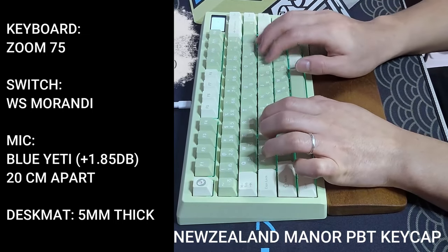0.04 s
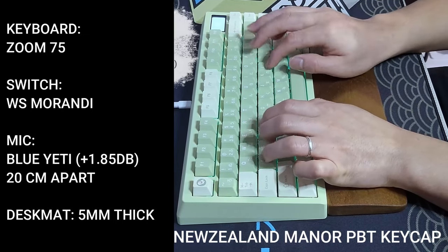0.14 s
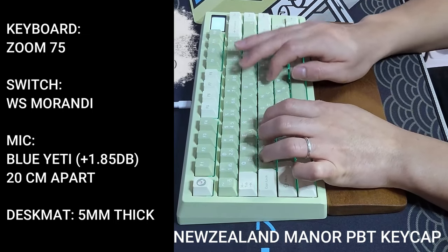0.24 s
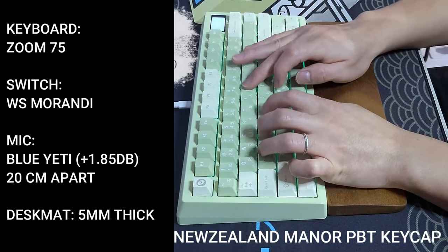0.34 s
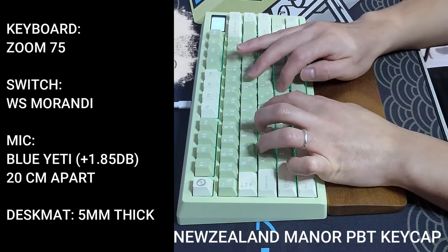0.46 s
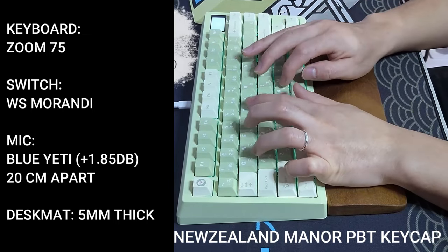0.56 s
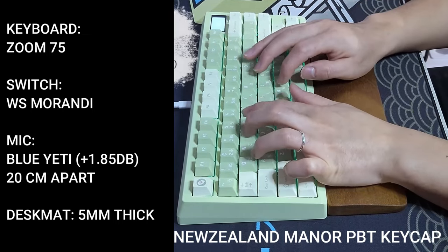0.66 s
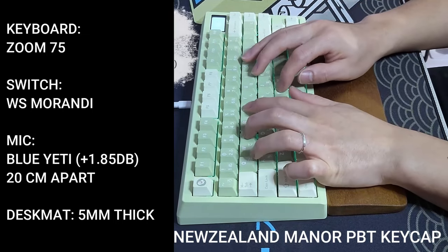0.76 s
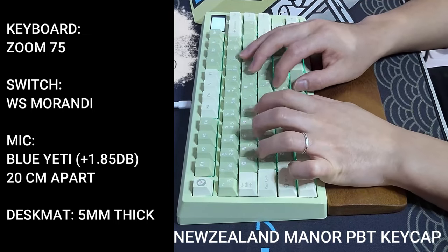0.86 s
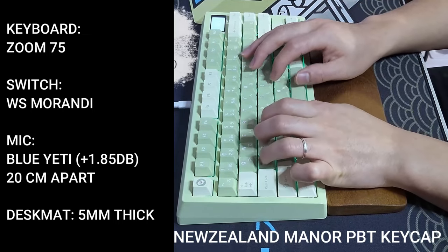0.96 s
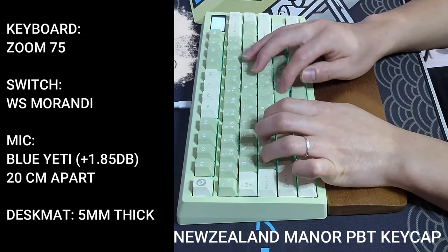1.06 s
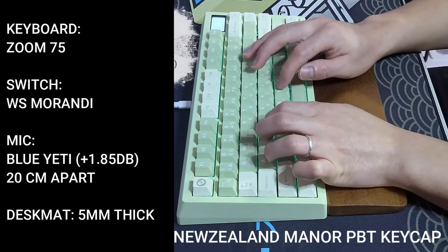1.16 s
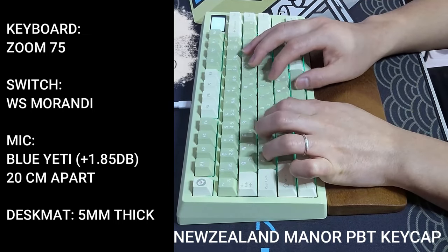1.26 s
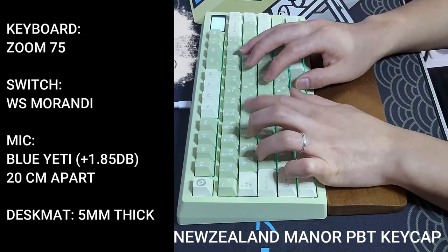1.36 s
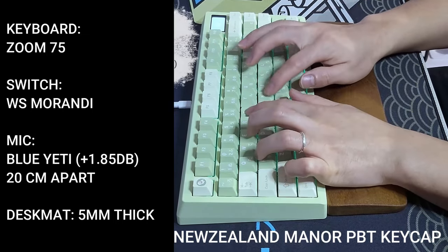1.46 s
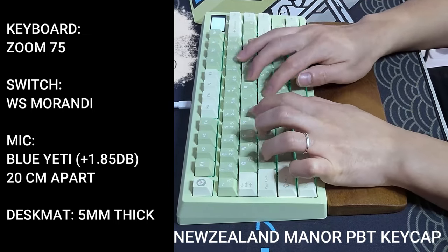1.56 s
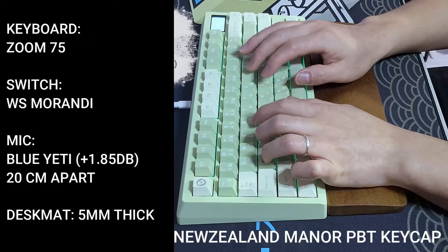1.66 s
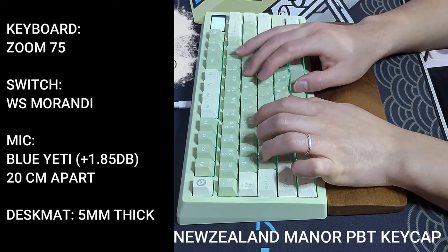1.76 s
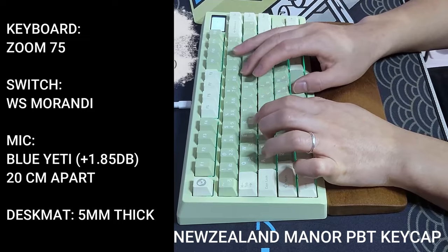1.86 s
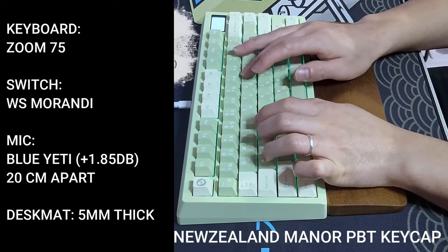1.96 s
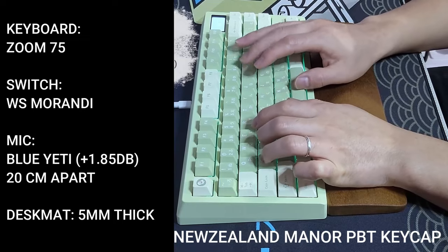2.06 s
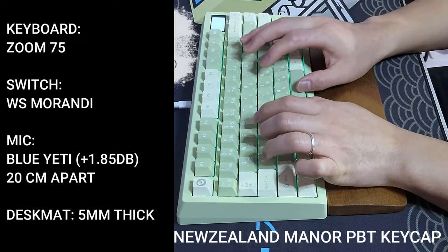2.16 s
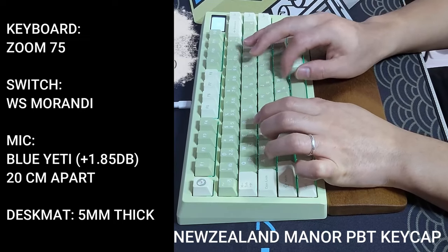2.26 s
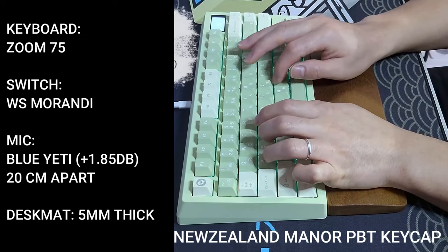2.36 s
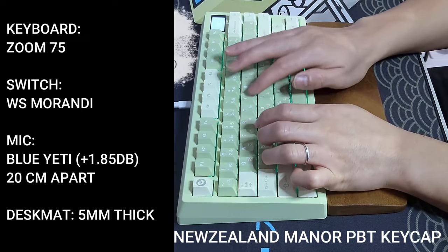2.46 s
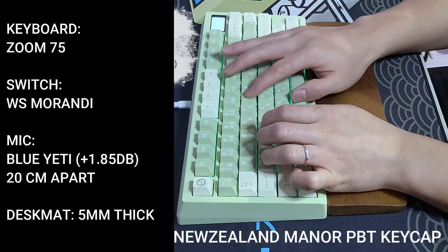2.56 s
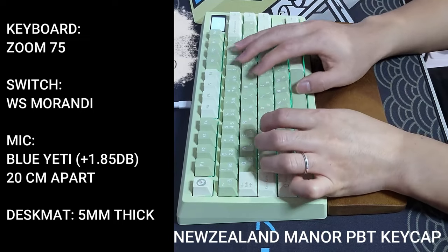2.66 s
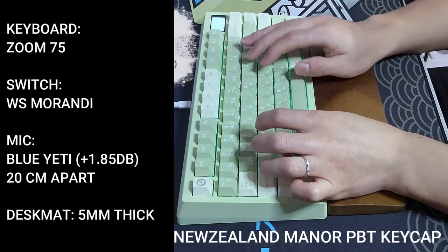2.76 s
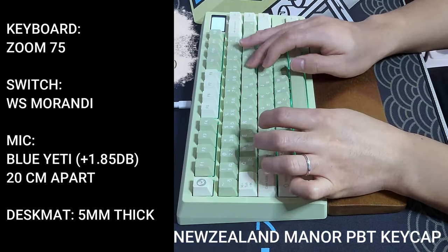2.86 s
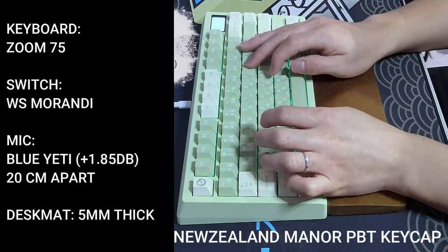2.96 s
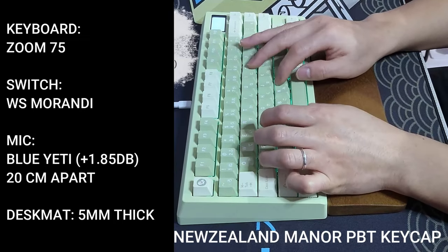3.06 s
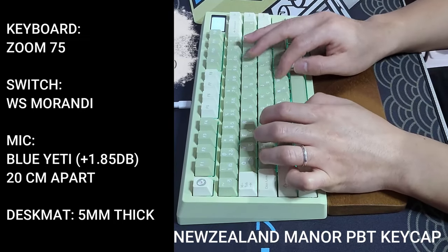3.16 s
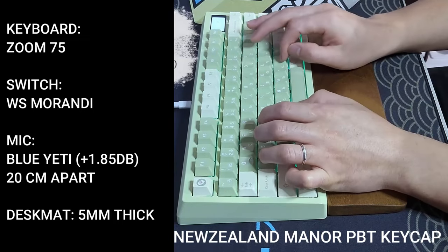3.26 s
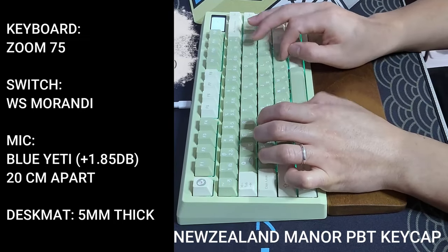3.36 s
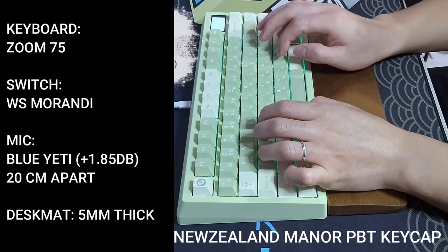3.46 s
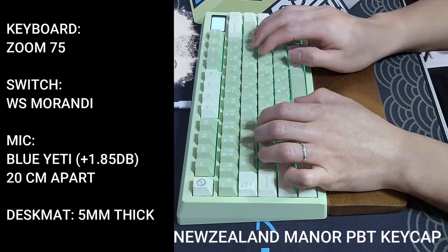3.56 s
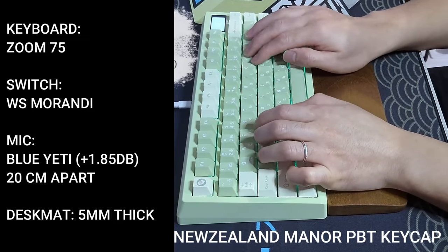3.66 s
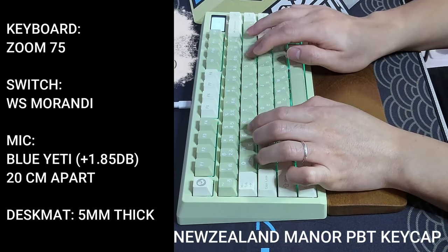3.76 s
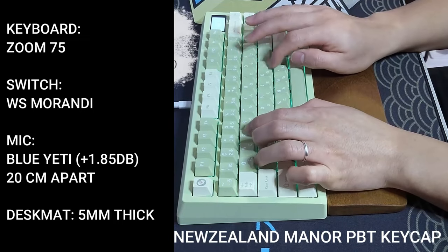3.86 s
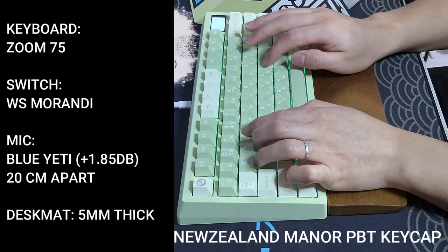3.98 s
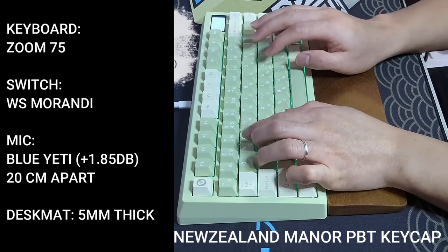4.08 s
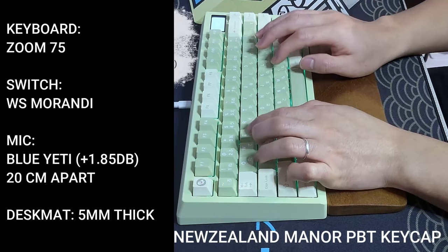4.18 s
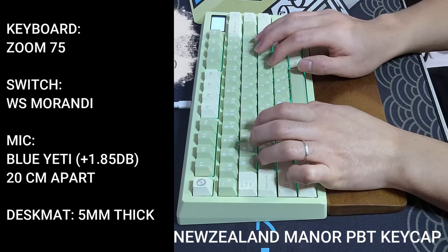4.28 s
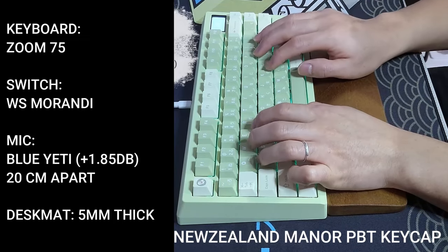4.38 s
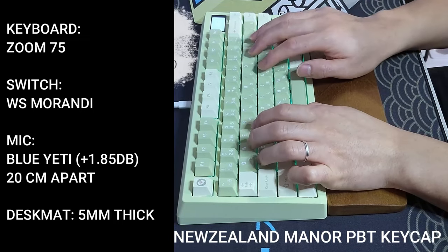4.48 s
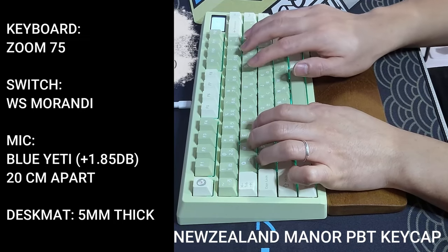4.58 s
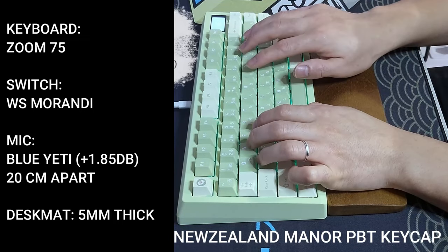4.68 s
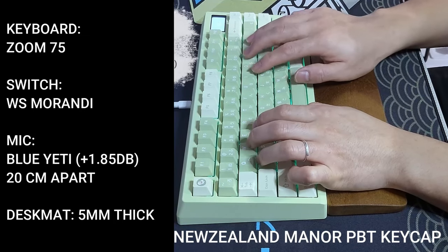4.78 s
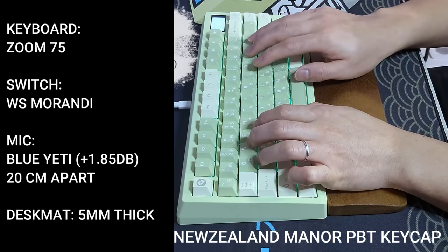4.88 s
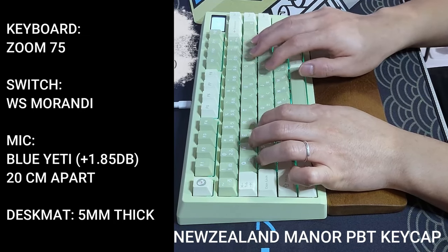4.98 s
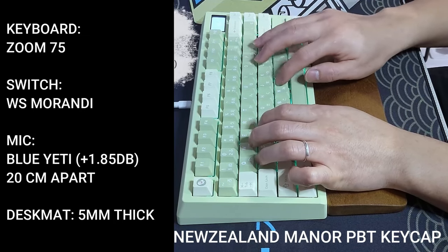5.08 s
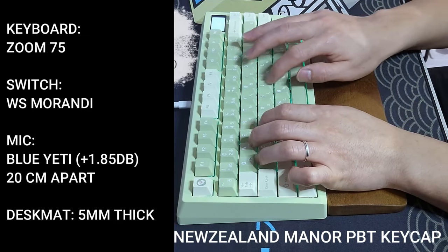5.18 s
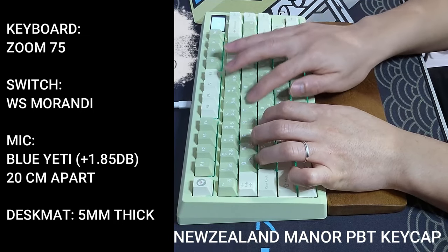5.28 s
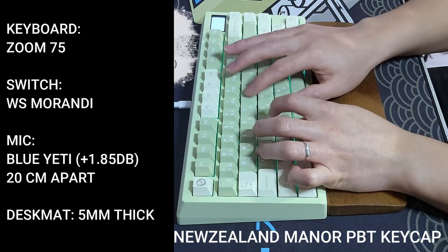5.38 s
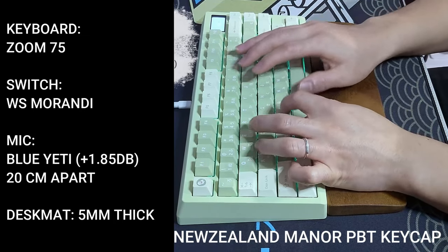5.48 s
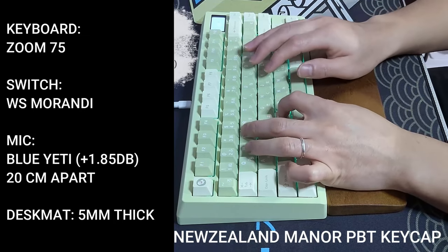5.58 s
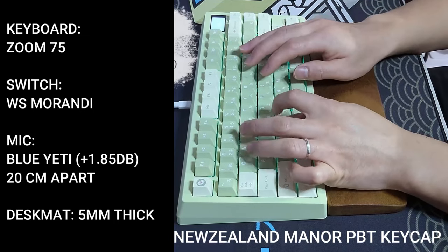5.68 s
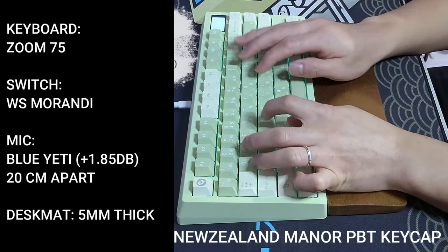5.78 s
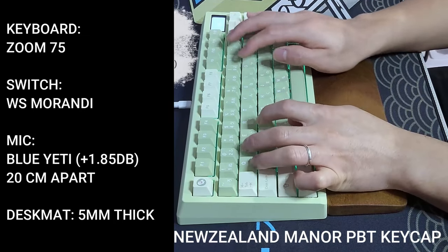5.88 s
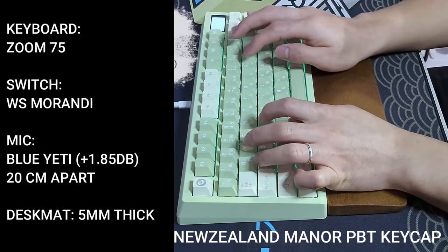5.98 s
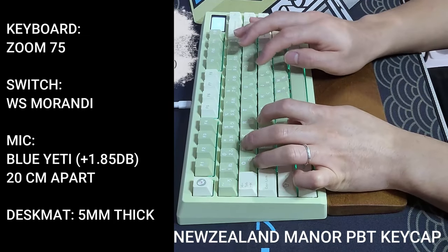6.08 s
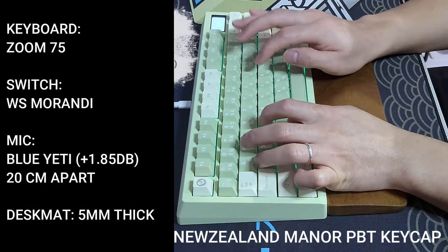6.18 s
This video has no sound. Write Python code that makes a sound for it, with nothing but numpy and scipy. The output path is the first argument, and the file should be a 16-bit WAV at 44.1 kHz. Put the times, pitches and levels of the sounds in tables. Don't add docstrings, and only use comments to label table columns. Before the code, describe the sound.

Dry, poppy key clicks in irregular quick bursts, close to the microphone. Each press is a very short knock of plastic cap and plate, with little sharp treble, followed by a softer release. Fingertips rustle faintly. A dense run lasts about four seconds, a pause of over half a second follows, then a final flurry. Slight short room echo and low hum behind.

```python
import sys
import numpy as np
from scipy import signal
from scipy.fft import rfft, irfft
from scipy.io import wavfile
from scipy.ndimage import uniform_filter1d

SR = 44100
rng = np.random.default_rng(int(sys.argv[2]) if len(sys.argv) > 2 else 0)


def ratio_of_db(decibels):
    return 10 ** (np.asarray(decibels, float) / 20)


def put_to_file(sound):
    columns = np.atleast_2d(sound).T
    safe = np.clip(columns, -1, 1)
    whole_steps = np.round(safe * 32767)
    wavfile.write(sys.argv[1], SR, whole_steps.astype(np.int16))


N = 274743

# (time [s], level [dB])
HAND_ACTIVITY = [(0.0, 4.5), (0.75, 2.5), (1.0, 0.5), (2.06, -2), (2.36, 3), (2.62, 4.5), (2.86, -0.5),
                 (3.45, 2.5), (4.16, -1.5), (4.4, -5), (4.96, -11.5), (5.17, -2.5), (5.55, 3.5),
                 (6.06, 2.5), (6.23, -2)]
# (lower limit [Hz], below it the part is too small to radiate;
# upper limit [Hz], above it the contact is too slow; settling rattle [dB])
CONTACT_SOFTNESS = [
    (1516, 3150, -23.5),
    (594, 9900, -20),
    (313, 1050, -22.5),
    (2470, 8970, -21.5),
    (6000, 12400, -21),
]


def rms_one(x):
    return x / np.sqrt(np.mean(x ** 2) + 1e-20)


def in_time(rows):
    return np.interp(np.arange(N) / SR, *np.transpose(rows))


def at_hz(rows, hz, axis=1):
    rows = np.array(rows)
    return np.interp(np.log(hz + 1e-9), np.log(rows[:, 0]), rows[:, axis])


def bandpass(x, order, low_hz, high_hz):
    edges_hz = [low_hz, min(high_hz, 0.45 * SR)]
    return signal.sosfilt(signal.butter(order, edges_hz, "band", fs=SR, output="sos"), x)


def coloured(spectrum):
    hz = np.fft.rfftfreq(N, 1 / SR)
    gain = ratio_of_db(at_hz(spectrum, hz)) * (hz > 6)
    return rms_one(irfft(rfft(rng.standard_normal(N)) * gain, N))


def ring(x, hz, t60):
    radius = ratio_of_db(-60 / (t60 * SR))
    angle = 2 * np.pi * hz / SR
    poles = [1, -2 * radius * np.cos(angle), radius * radius]
    return signal.lfilter([0, np.sin(angle)], poles, x + 1e-18)


def struck(at_s, modes, level_db, contact):
    scatter_db, settle_t60_s = 1.5, 0.023
    low_hz, high_hz, settle_db = contact
    at = np.round(at_s * SR).astype(int)
    scatter = rng.standard_normal((len(at), len(modes)))
    small = 1 + low_hz / 3500
    fade = ratio_of_db(-60 * small / (settle_t60_s * SR))
    out = np.zeros(N)
    for k, (hz, mode_db, t60) in enumerate(modes):
        blows = np.zeros(N)
        np.add.at(blows, at, ratio_of_db(level_db + mode_db + scatter_db * small * scatter[:, k]))
        settling = signal.lfilter([0, 1], [1, -fade], blows)
        rattle = settling * rng.standard_normal(N) * ratio_of_db(settle_db)
        out += ring(blows + rattle, hz, t60)
    return bandpass(out, 2, low_hz, high_hz)


def contacts():
    # (time [s], keycap [dB], plate [dB], tick [dB], case [dB])
    clacks = [(.4533, -21.5, -27, -39.5, -34), (.5661, -19.5, -23, -33, -34),
              (.8213, -22, -29.5, -45.5, -38), (1.3087, -20.5, -44, -41, -33.5),
              (1.5307, -24.5, -26, -55, -36), (2.0384, -27.5, -30.5, -44, -40),
              (2.6386, -18.5, -23, -38.5, -35), (2.950, -16.5, -24, -33.5, -31.5),
              (3.0144, -23, -28, -37.5, -32), (3.0864, -16.5, -18.5, -34, -29.5),
              (3.4224, -17, -24, -31.5, -32), (3.8291, -28, -33, -41, -50), (3.9283, -23, -28, -39, -33),
              (4.1039, -25.5, -29.5, -38, -34.5), (5.4333, -18.5, -24.5, -37.5, -34.5),
              (5.5073, -17, -28, -52, -38), (5.7689, -21, -35, -39, -29.5), (5.9541, -23, -30.5, -41, -41)]
    # (time [s], keycap [dB], plate [dB], tick [dB], case [dB])
    thocks = [(0.1144, -34, -27, -43.5, -33.5), (.169, -24, -21, -42, -34.5),
              (0.2068, -20, -22.5, -35.5, -32), (.2744, -26.5, -20, -43, -41),
              (0.5164, -22, -16.5, -45, -31.5), (0.7474, -22, -23.5, -67, -34.5),
              (0.878, -23, -23, -47, -36.5), (1.0896, -20, -19.5, -33, -34), (1.208, -21, -18, -38, -40),
              (1.5187, -32, -22.5, -52, -35), (1.6218, -24.5, -26.5, -40, -39.5),
              (1.6757, -22, -22, -38, -34.5), (2.049, -29, -23, -42, -32.5), (2.4242, -23, -21.5, -39, -33),
              (2.7188, -24.5, -26, -49.5, -37), (3.1855, -21, -21, -34, -35),
              (3.5251, -36.5, -31, -40.5, -32.5), (3.629, -24.5, -23, -54, -38.5),
              (4.3254, -26.5, -21.5, -48.5, -51), (5.1975, -23, -23.5, -37, -39.5),
              (5.5214, -51, -32.5, -42, -28.5), (5.6018, -25.5, -15, -53, -33.5)]
    # (time [s], keycap [dB], plate [dB], tick [dB], case [dB])
    taps = [(0.027, -24, -24, -45, -36.5), (0.5562, -27, -40, -45, -39.5), (0.65, -26.5, -27, -37.5, -32),
            (1.4096, -37, -28.5, -47, -42), (1.7152, -26, -34, -46.5, -39),
            (1.7725, -27.5, -52, -50, -36.5), (1.7895, -27, -25.5, -46, -41.5), (1.912, -34, -47, -43, -32),
            (2.154, -28.5, -33, -54, -41), (2.1803, -25, -32.5, -43.5, -36.5),
            (2.5006, -31.5, -33, -50.5, -35), (3.2407, -27.5, -32, -54, -35.5),
            (3.3021, -36, -29.5, -74, -41.5), (3.795, -26.5, -33, -42, -40),
            (4.0352, -30.5, -33, -44, -41.5), (4.2907, -29, -40, -56, -36.5), (5.273, -31.5, -27, -49, -38),
            (5.6371, -25.5, -28.5, -40, -37), (6.0288, -30, -41, -45, -35.5),
            (6.036, -33.5, -20, -47, -43.5)]
    # (time [s], keycap [dB], plate [dB], tick [dB])
    returns = [(.0004, -39, -36, -55), (.019, -39, -35, -50), (.121, -31.5, -27, -54),
               (.3099, -29, -39, -43), (.3134, -34, -39, -45), (.6147, -37, -50, -69),
               (.9466, -34.5, -35, -61), (.9776, -34, -37, -53), (1.1961, -31, -28, -53),
               (1.285, -32, -29, -51), (1.4069, -30.5, -43, -48.5), (1.6438, -34, -39, -64),
               (2.2639, -31, -30, -64), (2.3065, -38.5, -29.5, -52), (2.3667, -32, -28, -46),
               (2.8171, -39, -41, -54), (2.8274, -36.5, -29.5, -53), (2.8463, -30.5, -42, -64),
               (3.4955, -34, -37.5, -56), (3.8314, -29, -30, -66), (3.9956, -36.5, -52.5, -42),
               (4.0823, -36.5, -30, -58), (4.189, -33.5, -31.5, -85), (5.2936, -32, -28.5, -59),
               (5.3018, -42, -63, -50), (5.310, -39, -41, -50), (5.7267, -37.5, -47, -74),
               (5.7636, -34, -23.5, -40), (6.094, -34, -32, -54), (6.2076, -50.5, -84, -77)]
    # (time [s], keycap [dB], plate [dB], tick [dB])
    touches = [(.012, -40, -27, -51), (0.1965, -38, -50, -49), (.256, -54, -52, -66),
               (0.441, -43, -62, -46), (0.447, -60, -53, -52), (0.504, -42, -39, -53),
               (1.3882, -44, -44, -52), (1.6064, -43, -47, -55), (1.6616, -46, -44, -49),
               (1.899, -37.5, -35, -64), (2.411, -52, -31.5, -48), (2.620, -53, -57, -61),
               (2.697, -54, -53, -66), (2.9135, -54, -56, -78), (2.9377, -54, -40, -50),
               (2.9422, -38.5, -32.5, -67), (3.072, -61, -44, -52), (3.171, -55, -38, -51),
               (3.4071, -48, -62, -64), (3.411, -48, -42, -50), (3.609, -44, -61.5, -60),
               (3.7717, -49, -41, -57), (3.7791, -44, -56, -67), (5.0906, -48.5, -49, -59),
               (5.1756, -56, -40, -54), (5.252, -58, -66, -60), (5.418, -46, -70, -61),
               (5.709, -45, -45, -61), (5.9342, -44, -56, -60), (6.0134, -40, -36, -49)]
    # (time [s], keycap [dB], plate [dB], tick [dB])
    bounces = [(0.1425, -49, -60, -64), (.2127, -40, -62, -60), (0.2802, -36.5, -52, -57),
               (1.2877, -52, -31, -62), (1.776, -60, -34, -80), (1.930, -46, -72, -77),
               (1.954, -59, -55, -75), (2.7231, -35, -32, -51), (3.4994, -40, -50, -66),
               (3.638, -52, -36, -64), (4.2968, -39, -52, -48), (6.0421, -53.5, -49.5, -69),
               (6.1005, -42, -30.5, -52), (6.1056, -54, -38, -67)]
    light_case_db = [
        -37.5,
        -40,
        -40,
    ]
    usual_db, usual_tick_db, usual_stem_db = -25, -45, -42.5
    case_follows, stem_follows, stem_hardens = 0.76, 0.4, 0.6

    landings = np.vstack([clacks, thocks, taps])
    light = [returns, touches, bounces]
    at_s, cap_db, plate_db, tick_db = np.vstack([landings[:, :4], *light]).T
    blow_db = 20 * np.log10(ratio_of_db(cap_db) + ratio_of_db(plate_db)) - usual_db
    light_db = np.repeat(light_case_db, [len(table) for table in light])
    light_db = light_db + case_follows * blow_db[len(landings):]
    case_db = np.r_[landings[:, 4], light_db]
    stem_db = usual_stem_db + stem_follows * blow_db + stem_hardens * (tick_db - usual_tick_db)
    return at_s, cap_db, plate_db, case_db, stem_db, tick_db


def nearest(at_s, about_s):
    return at_s[np.abs(at_s[:, None] - about_s).argmin(axis=0)]


def wide_keys(at_s):
    # (time [s], desk thud [dB], stabiliser wire [dB])
    wide = [(0.0004, -45, -52), (0.018, -45.5, -52), (0.1153, -41.5, -53), (0.169, -48.5, -72),
            (0.5163, -44, -73), (0.5661, -41.5, -80), (0.9778, -41, -56), (1.0897, -41, -56),
            (1.207, -43.5, -77), (1.308, -44.5, -52), (1.4105, -46.5, -59), (1.5192, -38, -52),
            (1.9118, -39.5, -95), (2.05, -41, -54), (2.1822, -44, -76), (2.3065, -47.5, -55),
            (2.3667, -38, -49), (2.6386, -41, -74.5), (2.7193, -43, -60), (2.8274, -42.5, -58),
            (3.4234, -40.5, -68), (3.5251, -35.5, -47), (3.638, -45, -64), (5.5075, -65, -58),
            (5.5218, -36, -38), (5.6022, -38.5, -57)]
    # (frequency [Hz], level [dB], t60 [s])
    thud_modes = [(224.3, 2.5, 0.042), (241, -30.5, 0.033)]
    # (frequency [Hz], level [dB], t60 [s])
    wire_modes = [(4680, 2, .014), (4970, -8, .008)]
    wide_s, thud_db, wire_db = np.transpose(wide)
    wide_s = nearest(at_s, wide_s)
    thud = struck(wide_s, thud_modes, thud_db, (130, 600, -40))
    wire = struck(wide_s + 0.00102, wire_modes, wire_db, (4000, 6000, -18))
    return wire - thud


def hollow_caps(at_s):
    # (time [s], level [dB])
    hollow = [(0.169, -21.5), (0.2749, -26), (0.3099, -48), (0.5165, -27), (0.6147, -33.5), (0.8779, -27.5),
              (0.9776, -28.5), (1.0897, -18.5), (1.1961, -39), (1.208, -28), (1.285, -51), (1.4064, -36),
              (1.9118, -26), (2.5006, -34), (2.847, -28), (3.1851, -35), (3.4229, -41), (3.5245, -24.5),
              (3.6292, -19), (4.1039, -53.5), (4.3242, -26), (5.2733, -35), (5.2936, -40), (5.5218, -23.5)]
    # (frequency [Hz], level [dB], t60 [s])
    cavity_modes = [(1400, -3, .010), (1600, -9, .008)]
    # (frequency [Hz], level [dB], t60 [s])
    rim_modes = [(5600, -30, 0.0017), (6930, -35.5, .014)]
    hollow_s, hollow_db = np.transpose(hollow)
    hollow_s = nearest(at_s, hollow_s)
    cavity = struck(hollow_s, cavity_modes, hollow_db, CONTACT_SOFTNESS[1])
    rim = struck(hollow_s, rim_modes, hollow_db, CONTACT_SOFTNESS[3])
    return cavity - rim


def keys():
    # (frequency [Hz], level [dB], t60 [s])
    keycap_modes = [(2115, -1.5, 0.0098), (2385, -5, 0.0078), (2742, -10.5, 0.0066), (1800, -52, 0.0017)]
    plate_modes = [(1160, -8, .011), (1290, -13, .009)]
    case_modes = [(453, -15.5, 0.0047), (558, 0, 0.016), (670, 0.5, 0.016)]
    stem_modes = [(3410, -40, 0.0024), (4440, -6, 0.0028), (5150, -8, 0.0013), (6320, -14, 0.0036),
                  (6900, -23.5, 0.0085)]
    spring_modes = [(8040, -11.5, 0.0017), (9630, -7, 0.00092), (12500, 2, 0.0018), (13240, -22, 0.0062),
                    (14950, -7.5, 0.0035)]
    at_s, *levels = contacts()
    part_modes = [keycap_modes, plate_modes, case_modes, stem_modes, spring_modes]
    parts = zip(part_modes, levels, CONTACT_SOFTNESS)
    cap, plate, case, stem, spring = [struck(at_s, *part) for part in parts]
    return cap + stem + spring - plate - case + wide_keys(at_s) - hollow_caps(at_s)


def room(x):
    # (frequency [Hz], level [dB], t60 [s])
    tail = [(149, -27.5, 1), (391.4, -24.5, 0.33), (1000, -31, 0.34), (2200, -35, 0.5), (4490, -31.5, 0.2),
            (9000, -37.5, .15), (15940, -42, .12)]
    # (delay [s], level [dB])
    echoes = [
        (.0098, -23.5),
        (0.0216, -33),
    ]
    t = np.arange(SR // 2) / SR
    edges_hz = 100 * 2 ** np.arange(0, 7.6, 0.5)
    white = rng.standard_normal((2, 3, len(t)))
    answers = 0
    for k, (low, high) in enumerate(zip(edges_hz, edges_hz[1:])):
        sos = signal.butter(2, [low, high], "band", fs=SR, output="sos")
        band = signal.sosfilt(sos, white[k % 2])
        hz = np.sqrt(low * high)
        decay_db = -60 * t / at_hz(tail, hz, axis=2)
        answers = answers + band * ratio_of_db(at_hz(tail, hz) - 17 + decay_db)
    answers *= np.clip(t / 0.0063, 0, 1)
    turn = 2 * np.pi * (np.arange(N) * 3.1 / SR + np.arange(3)[:, None] / 3)
    out = signal.fftconvolve(x * np.cos(turn), answers, axes=1)[:, :N].sum(axis=0)
    dull = signal.sosfilt(signal.butter(1, 5000, fs=SR, output="sos"), x)
    for delay_s, echo_db in echoes:
        delay = round(delay_s * SR)
        out[delay:] += ratio_of_db(echo_db) * dull[:-delay]
    return out


def fingers():
    # (frequency [Hz], density [dB per Hz])
    skin = [(700, -6), (2100, 9), (3500, 0.5), (6500, -4), (9500, -8.5), (12500, -4.5), (16000, -5.5)]
    # (start [s], length [s], centre [Hz], level [dB])
    slides = [
        (0.664, 0.076, 6500, -81),
        (2.436, 0.034, 1800, -61.5),
        (2.435, .05, 6000, -89),
        (2.54, .07, 6500, -79),
        (2.712, 0.16, 11400, -73.5),
        (3.672, .03, 7000, -78),
        (4.127, 0.13, 6300, -81.5),
        (5.52, 0.11, 6000, -77),
        (5.616, 0.013, 11000, -67),
    ]
    rustle_db = -78
    grain = ratio_of_db(1.4 * rms_one(uniform_filter1d(rng.standard_normal(N), size=150)))
    out = ratio_of_db(rustle_db + in_time(HAND_ACTIVITY)) * rms_one(coloured(skin) * grain)
    for start_s, length_s, hz, slide_db in slides:
        i, n = round(start_s * SR), round(length_s * SR)
        band = bandpass(rng.standard_normal(SR // 4), 1, hz * 0.65, hz * 1.4)
        rub = band[:n] * grain[i:i + n] ** 2
        out[i:i + n] += ratio_of_db(slide_db) * rms_one(rub) * signal.windows.tukey(n, 0.5)
    return out


def background():
    # (frequency [Hz], density [dB per Hz])
    air_colour = [(12, 4), (25, -0.5), (36, -10.5), (85, -31.5), (300, -13.5), (600, -19.5), (3000, -42.5),
                  (16000, -45.5)]
    # (frequency [Hz], width [Hz], rms level [dB])
    resonances = [(93, 7.9, -79), (148.75, 6, -69), (202.3, 5, -74), (276, 27, -73.5), (441.4, 19, -71.5),
                  (875, 6.45, -87)]
    air_db, rumble_db, rumble_follows = -62.5, -65, 0.83
    hum = 0
    for hz, width_hz, hum_db in resonances:
        hum = hum + ratio_of_db(hum_db) * rms_one(ring(rng.standard_normal(N), hz, 3.6 / width_hz))
    low = bandpass(rng.standard_normal(N), 2, 20, 62)
    rumble = ratio_of_db(rumble_db + rumble_follows * in_time(HAND_ACTIVITY)) * rms_one(low)
    return ratio_of_db(air_db) * coloured(air_colour) + hum + rumble


def scene():
    board = keys()
    return (board + room(board) + fingers() + background())[None]


def band_limit(x):
    return signal.sosfilt(signal.butter(12, 16870, fs=SR, output="sos"), x)


def record(dry):
    mix = signal.sosfilt(signal.cheby2(10, 60, 16900, fs=SR, output="sos"), dry)
    return band_limit(mix)


dry = scene()
out = record(dry)
put_to_file(out)
```